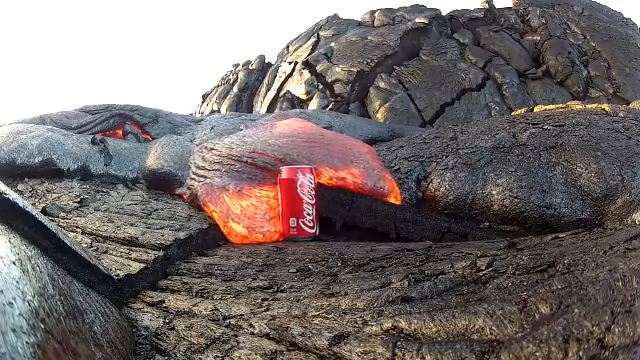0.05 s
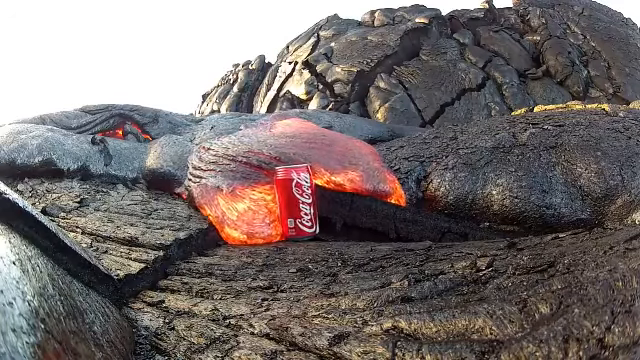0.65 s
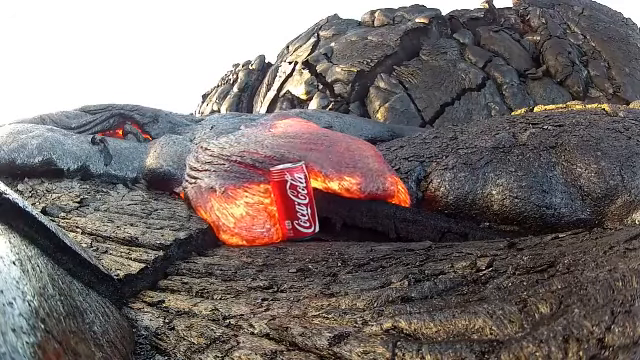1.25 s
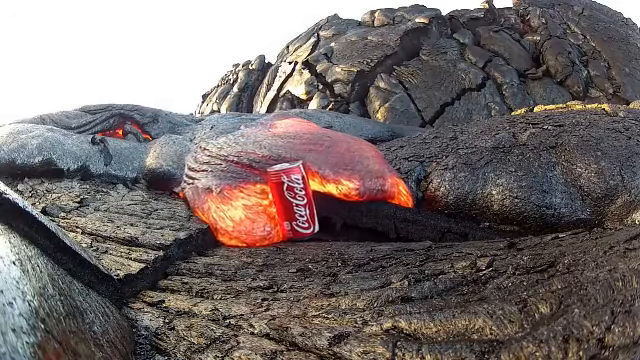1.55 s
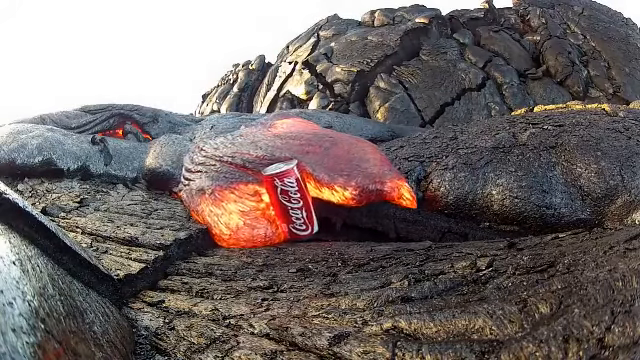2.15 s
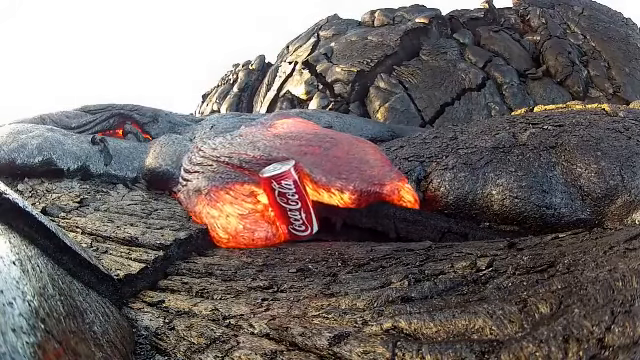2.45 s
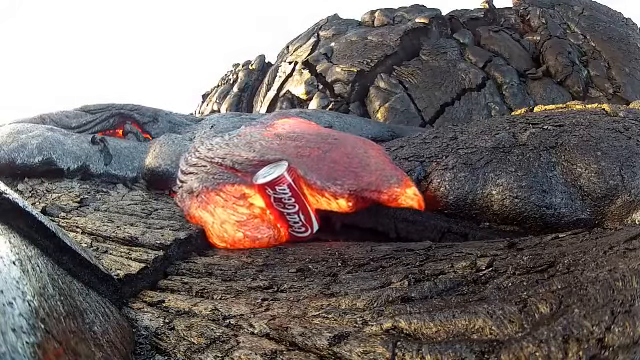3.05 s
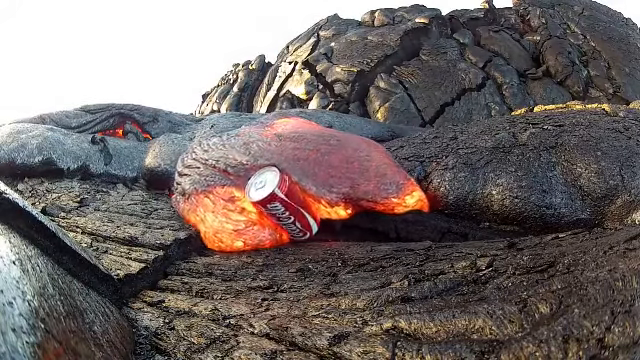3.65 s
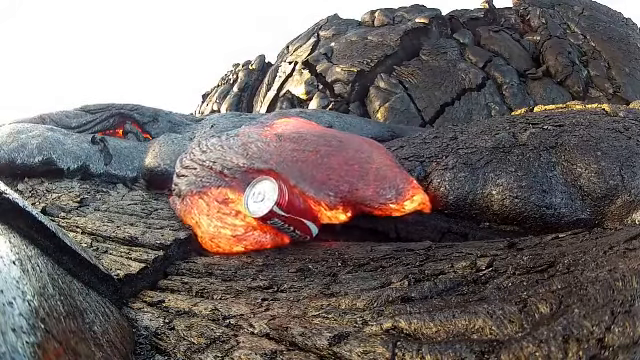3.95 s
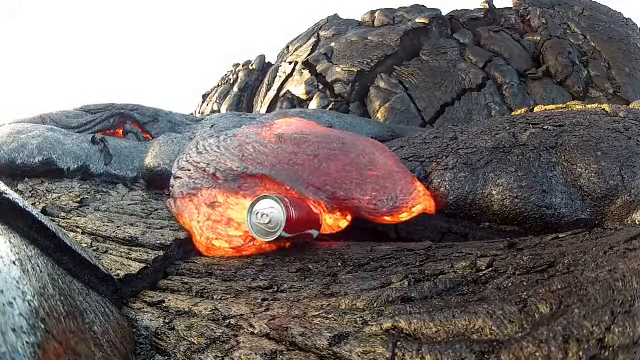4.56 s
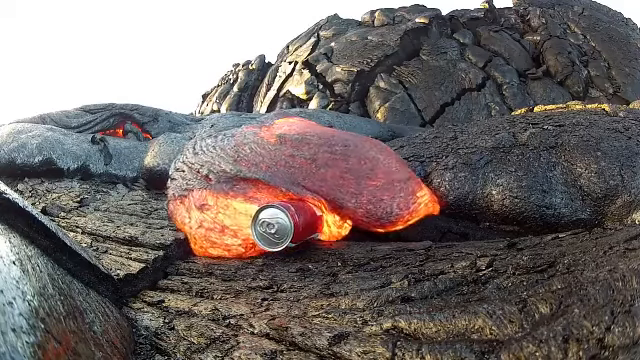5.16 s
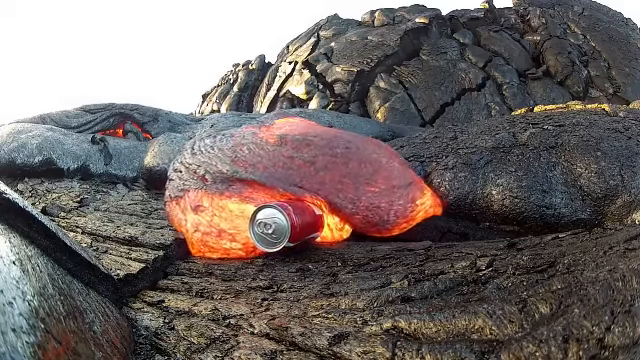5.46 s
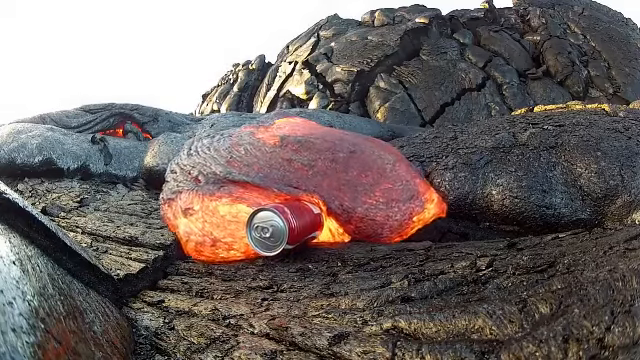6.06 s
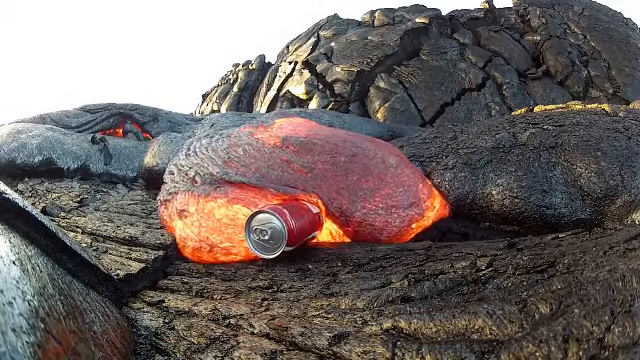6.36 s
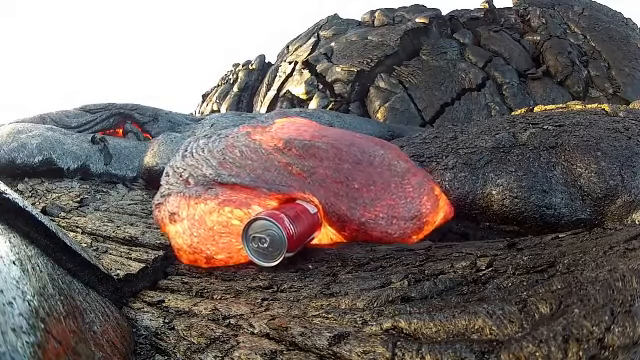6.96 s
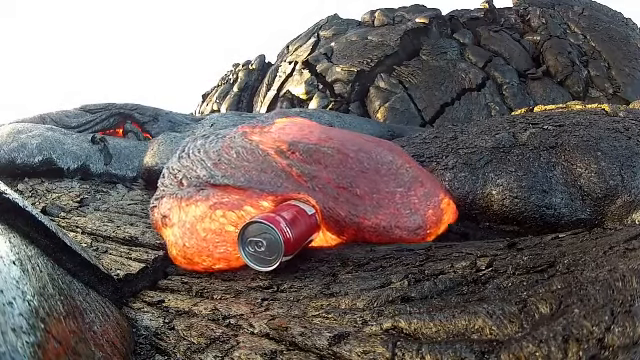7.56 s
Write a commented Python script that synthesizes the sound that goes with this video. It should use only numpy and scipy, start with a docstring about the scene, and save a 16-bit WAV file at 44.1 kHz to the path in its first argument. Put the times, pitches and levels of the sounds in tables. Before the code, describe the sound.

Lava creeps outdoors with a faint low rustle, glassy ticks, small snaps and dull knocks from its crust. A sealed drink can lying against it buckles with one loud, sharp metal pop. The quiet crackling carries on until the can suddenly tears open in a hissing blast of gas, followed by liquid spraying and sputtering on hot rock. A light breeze occasionally buffets the close microphone.

```python
"""A low rustle with glassy ticks, snaps and knocks: lava creeps outdoors in a light breeze, its brittle
crust fracturing. A sealed drink can lies against it; as pressure builds, the wall buckles and rings in
sharp metal pops. Then the wall tears: a turbulent blast of gas hisses out and dies, and a jet of liquid
sprays and sputters on the hot rock. One small microphone stands close by."""
import sys
import numpy as np
from scipy import signal
from scipy.io import wavfile
from scipy.ndimage import uniform_filter1d

SR = 44100
rng = np.random.default_rng(int(sys.argv[2]) if len(sys.argv) > 2 else 0)


def master(y):
    """Save y as 16-bit WAV."""
    cut = np.clip(np.atleast_2d(y).T, -1, 1)
    pcm = np.round(cut * 32767)  # scale
    wavfile.write(sys.argv[1], SR, pcm.astype(np.int16))


N = 343980
TIME = np.arange(N) / SR
TEAR_S, TEAR_RISE_S, TEAR_HOLD_S = 7.05, 0.018, 0.014  # the can's wall gives way

# Spectra of dull crust, splintering glass and escaping gas. Each row: frequency in Hz, level in dB.
RUSTLE_SPECTRUM = [(25, -22), (70, -1.5), (150, 2.5), (300, 3.5), (500, 0), (750, -2.5), (1100, -19),
                   (2000, -21), (4000, -31.5), (9000, -34), (15000, -31.5)]
CRACKLE_SPECTRUM = [(300, -31), (1200, 3.5), (2200, -1.5), (3600, 1), (5000, -1.5), (7800, -4.5),
                    (10500, -17), (12500, -4), (13500, -32), (15000, -10)]
GAS_SPECTRUM = [(100, 0.5), (1000, -7), (2000, -5), (3200, 0), (4700, 6), (7200, 3.5), (9000, -10),
                (10700, -23.5), (13300, -25), (15000, -13)]


def gain_of(db):
    """Converts decibels to amplitude."""
    return 10 ** (np.asarray(db) / 20)


def unit_rms(x):
    """Normalises to an rms of 1."""
    return x / np.sqrt(np.mean(x ** 2) + 1e-20)


def at_level(x, db, size=64):
    """Scales a transient so that its greatest rms over size samples is db."""
    return gain_of(db) * x / np.sqrt(uniform_filter1d(x ** 2, size, mode="constant").max() + 1e-20)


def gain_curve(rows):
    """Amplitude over time, interpolated in dB between (seconds, dB) points."""
    return gain_of(np.interp(TIME, *np.transpose(rows)))


def envelope(start, rise_s, hold_s=0, fall_db_per_s=0):
    """Linear rise, hold, then exponential decay."""
    age = TIME - start
    return np.clip(age / rise_s, 0, 1) * gain_of(-fall_db_per_s * np.maximum(age - rise_s - hold_s, 0))


def add(mix, s, sound):
    """Superposes a sound on the mix at s seconds."""
    part = mix[max(round(s * SR), 0):][:len(sound)]
    part += sound[:len(part)]


def shaped(x, db_at, size=4096):
    """Minimum-phase filter whose gain in dB is db_at(Hz)."""
    hz = abs(np.fft.fftfreq(size, 1 / SR))
    log_gain = np.log(gain_of(np.maximum(db_at(hz), -100)))
    taps = np.fft.ifft(np.exp(np.conj(signal.hilbert(log_gain)))).real[:size // 2]
    return signal.oaconvolve(x, taps)[:len(x)]


def coloured(x, points):
    """Filters x with a spectral envelope through (Hz, dB) points."""
    hz, db = np.transpose(points)
    return shaped(x, lambda f: np.interp(np.log(f + 1), np.log(hz), db))


def resonate(x, hz, q):
    """A damped second-order resonance."""
    return signal.lfilter(*signal.iirpeak(min(hz, SR / 3), max(q, 1), fs=SR), x)


def drift(per_s):
    """Random modulation of rms 1 with per_s turning points a second."""
    steps = rng.standard_normal(N // 64)
    return unit_rms(np.interp(TIME * per_s, np.arange(len(steps)), steps))


def grains(per_s, spread_db, most=4.2):
    """Shot noise: random impulses, many small and a few large."""
    sizes = gain_of(spread_db * np.minimum(rng.exponential(1, N), most))
    return unit_rms(sizes * rng.choice([-1, 1], N) * (rng.random(N) < per_s / SR))


def fracture(t60, debris, size=4096):
    """An impulse with an exponentially decaying shower of smaller ones."""
    shower = rng.standard_normal(size) * gain_of(-60 * np.arange(size) / SR / t60)
    return signal.unit_impulse(size) + debris * shower / np.linalg.norm(shower)


def fragments(pitches_hz, per_s, t60, q):
    """Random impacts: each size of fragment clicks at its own resonance, scattered by rough rock."""
    clicks = [resonate(fracture(t60, debris=1.1), hz, q) for hz in pitches_hz]
    showers = (signal.oaconvolve(grains(per_s, spread_db=4, most=3.4), click)[:N] for click in clicks)
    return unit_rms(sum(showers))


def lava_creep():
    """Acoustic emission: the strained skin rustles as it wrinkles, shedding crumbs and glass splinters."""
    # Strength of the creep. Each row: time in seconds, rustle level in dB.
    creep = [(0.0, -53), (0.4, -56.5), (1.05, -56), (1.35, -54.5), (3.8, -55.5), (4.6, -52.5),
             (4.95, -55.5), (6.4, -56), (7.0, -53.5)]
    strain = drift(per_s=16)  # the skin yields in fits, low and high together
    wrinkles = grains(per_s=700, spread_db=0.5) * gain_of(2 * strain + 1.38 * drift(per_s=25))
    rustle = unit_rms(coloured(wrinkles, RUSTLE_SPECTRUM))
    crumbs = fragments(np.geomspace(900, 2400, 6), per_s=3.9, t60=0.0085, q=4)
    splinters = fragments(np.geomspace(2800, 10000, 12), per_s=10, t60=0.013, q=3)
    near_ticks = grains(per_s=40, spread_db=3, most=0.83)
    sizzle = 0.85 * rng.standard_normal(N)
    glass = (splinters + 0.55 * near_ticks) * gain_of(1.8 * strain)
    fizz = unit_rms(coloured(glass + sizzle, CRACKLE_SPECTRUM))
    return gain_curve(creep) * (rustle + gain_of(-19) * crumbs + gain_of(-8.5) * fizz)


def wind():
    """Turbulent pressure fluctuations: a breeze and a few puffs buffet the microphone."""
    # A breeze with one lull. Each row: time in seconds, level in dB.
    breeze = [(0.0, -60), (5.2, -58), (6.0, -64), (7.0, -57)]
    # Puffs on top of it. Each row: middle in seconds, length in seconds, level in dB.
    puffs = [(0.611, 0.15, -50), (0.778, 0.12, -54.5), (1.69, 0.17, -53.5), (2.08, 0.11, -37),
             (3.072, 0.27, -49.5), (4.41, 0.063, -45), (7.57, 0.45, -46.5)]
    # Spectrum of the buffeting. Each row: frequency in Hz, level in dB.
    gust_spectrum = [(10, -11.5), (30, -4), (80, -3), (140, -4.5), (260, -19.5), (600, -44), (2000, -70.5)]
    gain = gain_curve(breeze)
    for middle, length, db in puffs:
        add(gain, middle - length / 2, gain_of(db) * signal.windows.hann(round(length * SR)))
    return gain * unit_rms(coloured(rng.standard_normal(N), gust_spectrum))


def plate_knocks():
    """Impact excitation: heavy plates of crust knock with a dull, damped resonance."""
    # Each row: start in seconds, peak level in dB, pitch in Hz.
    knocks = [(0.078, -36, 424), (0.117, -37, 210), (0.55, -36.5, 390), (0.597, -37, 664),
              (2.628, -35.5, 353), (2.789, -32, 277), (3.081, -35, 342), (3.574, -28.5, 285),
              (4.39, -26.5, 430), (4.596, -35.5, 436), (4.646, -35, 470), (4.706, -34.5, 285),
              (5.024, -35, 560), (5.143, -36, 414), (5.545, -43.5, 501)]
    out, onset_delay_s = np.zeros(N), 0.0025
    for s, db, hz in knocks:
        shove = coloured(fracture(t60=0.062, debris=0.73), RUSTLE_SPECTRUM)
        grit = coloured(fracture(t60=0.06, debris=1.9), CRACKLE_SPECTRUM)
        knock = unit_rms(0.51 * shove + resonate(shove, hz, q=3)) + 0.11 * unit_rms(grit)
        add(out, s + onset_delay_s, at_level(knock, db, size=1))
    return out


def glass_flakes():
    """Brittle fracture: flakes chip off the skin, each with a brief, high resonance."""
    # Each row: start in seconds, level in dB.
    flakes = [(0.0994, -35.5), (0.5695, -46.5), (0.6846, -45.5), (1.1894, -49), (1.3446, -49.5),
              (1.7504, -47.5), (1.809, -42.5), (2.3199, -46.5), (2.7906, -45), (3.0858, -44.5),
              (4.0975, -44.5), (4.472, -45.5), (4.6703, -45), (5.026, -45.5), (5.6379, -43.5),
              (5.6692, -46.5), (5.78, -48.5), (6.3554, -44.5)]
    out = np.zeros(N)
    for s, db in flakes:
        chip = coloured(fracture(t60=0.0055, debris=rng.uniform(0.5, 1.7)), CRACKLE_SPECTRUM)
        ring = resonate(chip, rng.uniform(3400, 8000), q=3.7)
        add(out, s, at_level(chip + 2 * ring, db))
    return out


def can_buckles():
    """Snap-through buckling: the wall pops outward, rings in its modes and jolts the rock beneath."""
    # Each row: start in seconds, level in dB.
    buckles = [(0.1812, -31.5), (0.2814, -33), (3.0351, -12.5), (3.0414, -9.5), (3.0462, -24),
               (3.0553, -32.5), (4.387, -46), (6.6280, -46.5), (6.688, -48), (6.972, -41), (7.023, -45)]
    # Modes of the liquid-damped wall. Each row: frequency in Hz, level in dB, 60 dB decay in seconds.
    wall_modes = [(689, -13, 0.061), (770, -11, 0.02), (850, -11, 0.021), (1540, -5.5, 0.011),
                  (1986, -14.5, 0.036), (2160, -4.5, 0.0074), (2408, -0.5, 0.013), (2595, -3, 0.0195),
                  (2700, -12, .018), (5670, -15.5, 0.023), (6400, -18, 0.018), (9330, -10.5, .016),
                  (9560, -14, 0.014), (11010, -30, .018), (12990, -34.5, 0.022), (14400, -10, 0.011),
                  (15100, -11.5, 0.012)]
    full_buckle_db, damping_db_per_s_per_db, thud_db = -9.5, 50, -23
    out, t = np.zeros(N), np.arange(SR // 8) / SR
    bass_cut = signal.butter(6, 580, "high", fs=SR)  # so small a wall radiates no bass
    ring = sum(gain_of(db - 60 * t / t60) * np.sin(2 * np.pi * hz * t) for hz, db, t60 in wall_modes)
    flip = 1 - np.exp(-t / 0.00034)  # the wall needs a moment to flip over
    for s, db in buckles:
        scatter = fracture(t60=0.038, debris=0.17)  # faint reflections from the rocks around
        pop = unit_rms(signal.fftconvolve(ring, scatter)[:len(t)])
        crease = unit_rms(fracture(t60=0.035, debris=1.7, size=len(t)))
        # A weak buckle moves a smaller, better damped patch of wall.
        damping = gain_of(-damping_db_per_s_per_db * max(full_buckle_db - db, 0) * t)
        radiated = signal.lfilter(*bass_cut, flip * damping * (pop + 0.13 * crease))
        thud = coloured(fracture(t60=0.03, debris=0.42), RUSTLE_SPECTRUM)
        add(out, s, at_level(radiated, db))
        add(out, s, at_level(thud, db + thud_db))
    return out


def crust_snaps():
    """Sudden stress release: a clean crack sets the broken plate ringing for a cycle or two."""
    # Each row: start in seconds, level in dB, pitch of the plate in Hz.
    snaps = [(0.282, -25.5, 680), (0.6086, -40.5, 4000), (1.4204, -36, 600), (2.7088, -31.5, 520),
             (2.7242, -35, 594), (3.369, -46, 1800), (5.0866, -39.5, 1700)]
    out = np.zeros(N)
    band = signal.butter(2, [220, 13000], "band", fs=SR)
    for s, db, hz in snaps:
        split = fracture(t60=0.019, debris=0.36)
        relaxation = signal.lfilter([1], [1, -np.exp(-2 * np.pi * hz / SR)], split)
        crack = relaxation + 0.23 * split
        snap = crack + 0.5 * resonate(crack, hz, q=2.3)
        add(out, s, at_level(-signal.lfilter(*band, snap), db))
    return out


def scrapes_and_thud():
    """Filtered shot noise: gritty scrapes and crunches, and one low thud after the can's loudest pop."""
    # Each row: start in seconds, length in seconds, level in dB, centre frequency in Hz.
    bursts = [(.585, 0.062, -43.5, 520), (0.679, .17, -48, 615), (0.895, 0.04, -59, 1850),
              (1.498, .1, -46, 480), (1.808, 0.035, -55, 1380), (3.04, 0.082, -39.5, 124),
              (3.545, .045, -53.5, 1240), (4.401, 0.072, -40.5, 405), (4.641, .19, -53, 3000),
              (4.779, .05, -47, 352), (5.02, 0.059, -47, 617)]
    out, clicks_per_s = np.zeros(N), 900
    for s, length, db, hz in bursts:
        swell = signal.windows.tukey(round(length * SR), 0.6)
        sizes = swell * rng.standard_normal(SR)[:len(swell)]
        clicks = sizes * (rng.random(SR)[:len(swell)] < clicks_per_s / SR)
        add(out, s, at_level(resonate(resonate(clicks, hz, q=2.3), hz, q=1.1), db))
    return out


def gas_spits():
    """Transient jet noise: small spits of gas hiss and die at once."""
    # Each row: start in seconds, level in dB.
    spits = [(4.737, -45.5), (4.792, -47.5), (5.401, -50), (6.8504, -37)]
    out = np.zeros(N)
    for s, db in spits:
        hiss = coloured(fracture(t60=0.044, debris=1.8), GAS_SPECTRUM)
        add(out, s, at_level(resonate(hiss, 5000, q=0.94), db))
    return out


def outflow(db, fall_db_per_s, lead_s=0):
    """Pressure release: flow through the tear rises, holds at db and decays exponentially."""
    return gain_of(db) * envelope(TEAR_S - lead_s, TEAR_RISE_S, TEAR_HOLD_S, fall_db_per_s)


def pinhole_leak():
    """Envelope of the brief discharge through a pinhole just before the tear."""
    return outflow(db=-43, fall_db_per_s=607, lead_s=0.025)


def gas_blast():
    """Turbulent jet noise: gas blasts through the tear, then the can vents the rest more slowly."""
    blast = outflow(db=-26, fall_db_per_s=607)
    vent = outflow(db=-26, fall_db_per_s=115)
    turbulence = rng.standard_normal(N) + 0.57 * grains(per_s=2300, spread_db=5.5)
    hiss = unit_rms(coloured(turbulence, GAS_SPECTRUM)) * gain_of(0.36 * drift(per_s=270))
    return (pinhole_leak() + blast + vent) * hiss


def liquid_jet():
    """Atomisation and boiling: liquid sprays out and sputters on hot rock; the flows add in power."""
    # Spectra of the spray and the boiling. Each row: frequency in Hz, level in dB.
    spray_spectrum = [(200, -9), (1000, -1), (2000, -1), (3600, 2.5), (5000, 2), (7500, -2), (9000, -7),
                      (10700, -19), (11600, -9), (13300, -17), (15000, -12.5)]
    sputter_spectrum = [(25, -17), (100, -11.5), (220, -1), (400, 2.5), (600, 1.5), (760, -1), (900, -9),
                        (1200, -27.5), (3000, -52)]
    jet_s, slosh_hz, surge_db = 7.337, 1.97, 1.6
    # The blast flings out mist and a splash; the jet follows, surging as the liquid sloshes.
    mist = outflow(db=-43, fall_db_per_s=40)
    splash = outflow(db=-36.5, fall_db_per_s=55)
    slosh = np.cos(2 * np.pi * slosh_hz * (TIME - jet_s))
    jet = gain_of(-38 + surge_db * slosh) * envelope(jet_s, rise_s=0.018)
    # Liquid gathers on the rock, boils up once and settles to a simmer.
    boil = gain_of(-33.5) * envelope(jet_s, rise_s=0.16, fall_db_per_s=86)
    simmer = gain_of(-36) * envelope(jet_s, rise_s=0.081)
    droplets = rng.standard_normal(N) + 0.83 * grains(per_s=3000, spread_db=4)
    spray = unit_rms(coloured(droplets, spray_spectrum)) * gain_of(0.44 * drift(per_s=76))
    bubbles = grains(per_s=3000, spread_db=2.5)
    sputter = unit_rms(coloured(bubbles, sputter_spectrum)) * gain_of(0.83 * drift(per_s=80))
    wetting = np.linalg.norm([pinhole_leak(), splash, boil, simmer], axis=0)
    return np.hypot(mist, jet) * spray + wetting * sputter


def wall_rupture():
    """Pressure transients: the first rush of gas thumps the air and the metal rips in jerks."""
    # Each row: start in seconds, level in dB.
    rips = [(7.0677, -14), (7.0814, -20)]
    out, thump_s = np.zeros(N), 7.055
    for s, db in rips:
        add(out, s, at_level(coloured(fracture(t60=0.0073, debris=0.72), GAS_SPECTRUM), db))
    push = signal.windows.tukey(round(0.032 * SR), 0.5)
    rush = np.pad(push * rng.standard_normal(len(push)), (0, len(push)))
    add(out, thump_s, at_level(coloured(rush, RUSTLE_SPECTRUM), db=-21.5))
    return out


def scene():
    """Superposition: all sources sum at one point in the open air."""
    mix = lava_creep() + glass_flakes() + gas_spits() + crust_snaps() + plate_knocks()
    mix += scrapes_and_thud() + can_buckles() + gas_blast() + liquid_jet() + wall_rupture()
    return (mix + wind())[None]


def record(dry):
    """The microphone's frequency response: two narrow notches and an upper band limit."""
    # Each row: centre in Hz, width in Hz, gain at the centre in dB.
    notches = [(5987, 924, -14.5), (12020, 170, -21.5)]
    edge_hz = 15450
    heard = shaped(dry[0], lambda f: sum(db / (1 + (2 * (f - hz) / width) ** 2)
                                         for hz, width, db in notches))
    low_pass = signal.firwin(511, edge_hz, window=("kaiser", 9), fs=SR)
    return signal.oaconvolve(heard, low_pass, "same")[None]


dry = scene()
out = record(dry)
master(out)
```